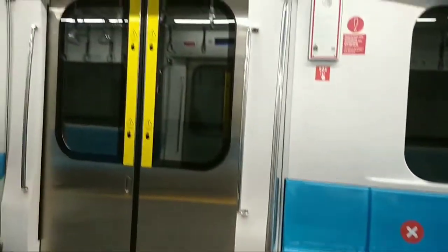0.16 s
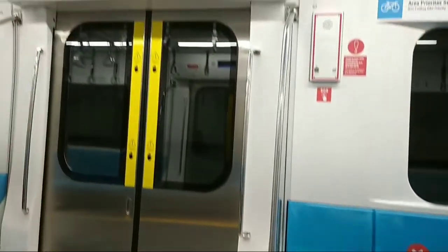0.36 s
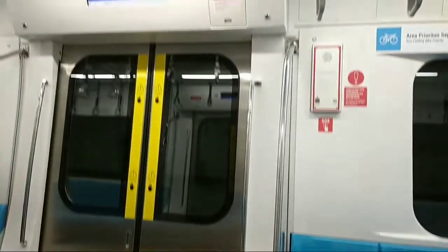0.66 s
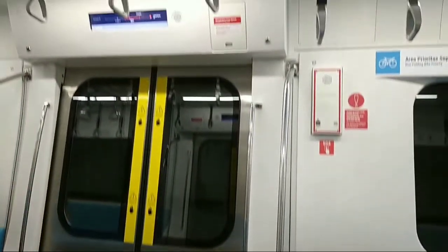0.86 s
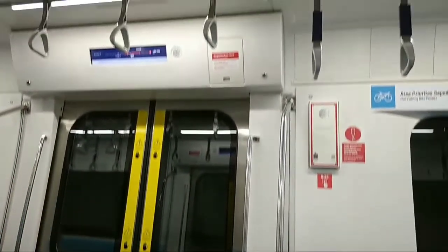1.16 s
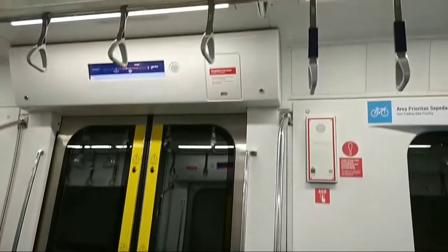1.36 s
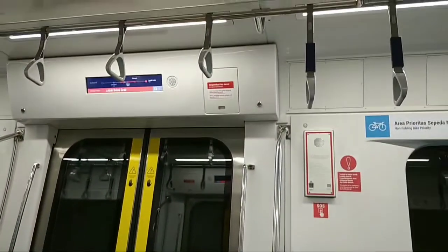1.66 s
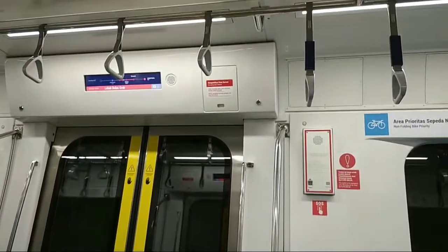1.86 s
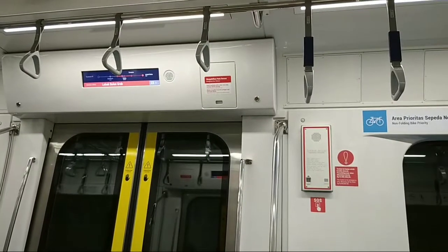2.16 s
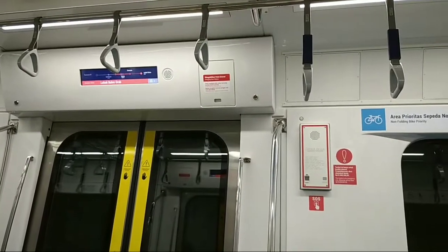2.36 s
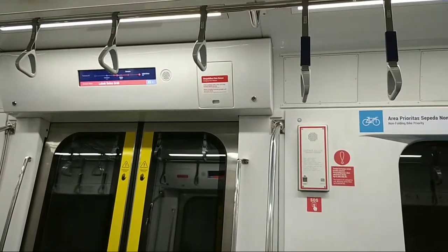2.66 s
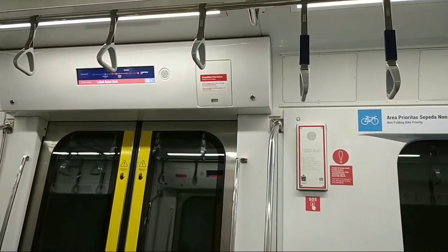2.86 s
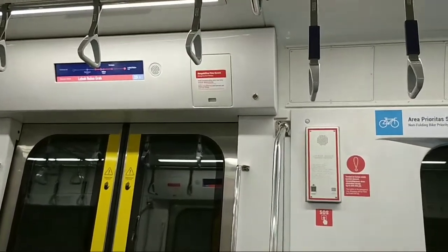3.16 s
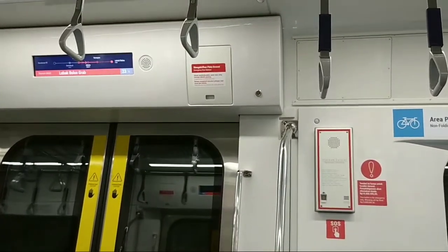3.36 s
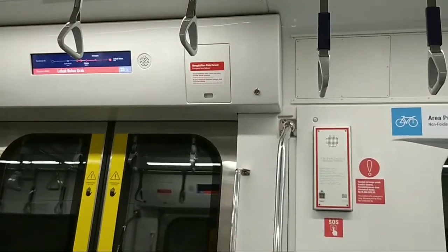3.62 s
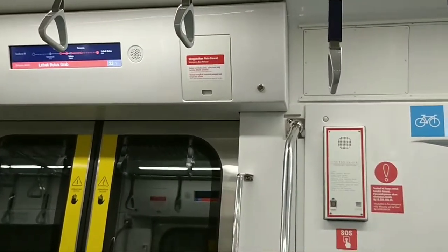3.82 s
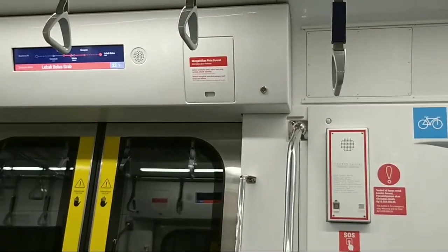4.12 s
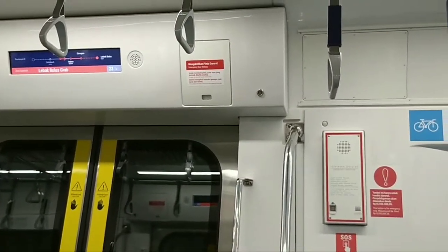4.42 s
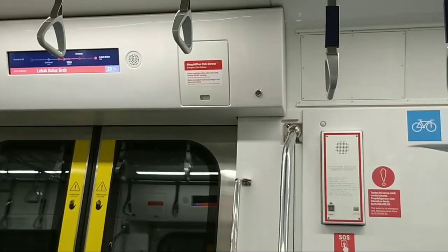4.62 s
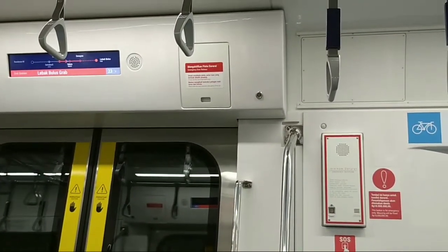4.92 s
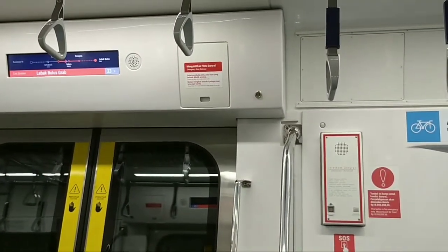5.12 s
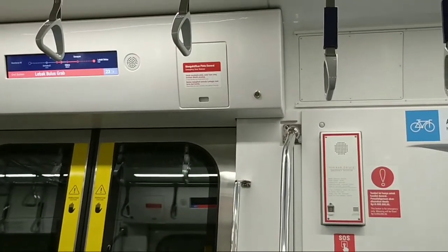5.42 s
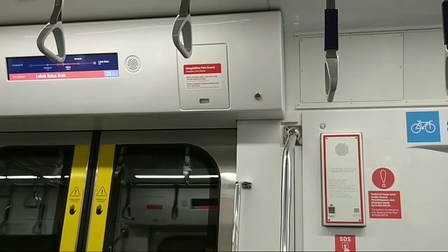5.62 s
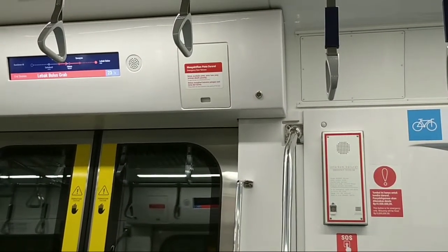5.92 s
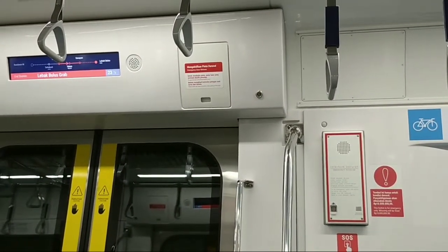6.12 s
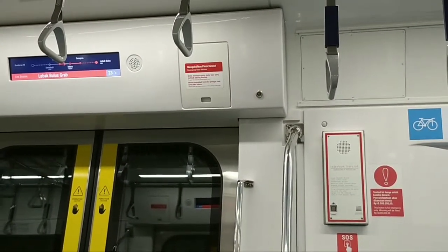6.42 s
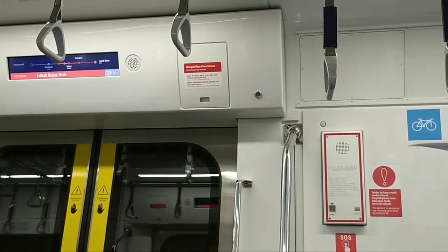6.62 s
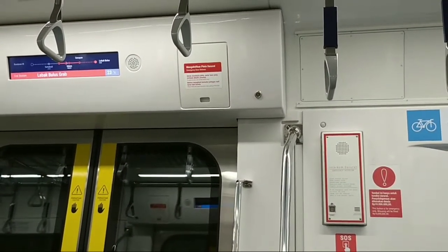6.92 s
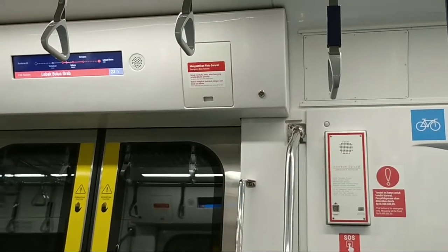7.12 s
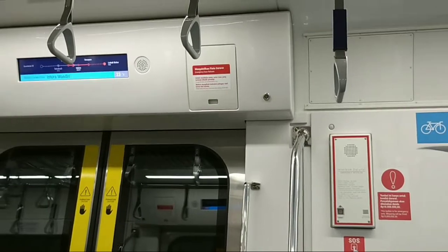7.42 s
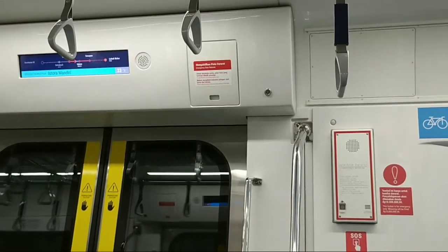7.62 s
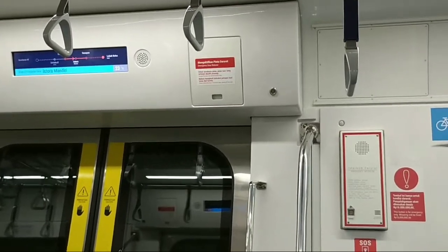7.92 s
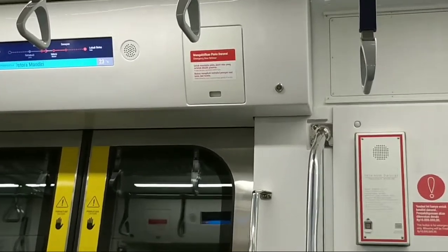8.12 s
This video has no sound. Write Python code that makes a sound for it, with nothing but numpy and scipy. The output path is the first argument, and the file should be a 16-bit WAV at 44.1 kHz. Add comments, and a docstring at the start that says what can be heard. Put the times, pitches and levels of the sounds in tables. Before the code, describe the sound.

A metro train runs through a tunnel, heard inside the carriage as a steady wheel roar, low rumble and thin hiss.

```python
"""Inside a metro carriage running through a tunnel at steady speed, heard from all sides in stereo.
From the start the wheels roar on the rail, the car body rumbles and the running gear hums under a thin
hiss, while rail and wheel resonances take turns to sing out. Between 1.2 and 2.6 s loose fittings tick
faintly on the left. Near 7.5 s three rough notes sing together, then the hum swells to the end.
Throughout, the recorder evens out the level and holds down the highest peaks."""
import sys
import numpy as np
from scipy.fft import rfft, irfft, next_fast_len
from scipy.io import wavfile
from scipy.ndimage import uniform_filter1d, minimum_filter1d, map_coordinates

SR = 44100
rng = np.random.default_rng(int(sys.argv[2]) if len(sys.argv) > 2 else 0)


def put_to_file(sound):
    """Save the sound as 16-bit audio at rate SR, in the file named by the first command-line argument."""
    columns = np.atleast_2d(sound).T  # one column per channel
    safe = np.clip(columns, -1, 1)
    whole_steps = np.round(safe * 32767)
    wavfile.write(sys.argv[1], SR, whole_steps.astype(np.int16))


N = 365059


# Tone colour of the rail's roar: freq_hz, level_db
RAIL_SPECTRUM = [(30, -75.5), (250, -19.5), (400, -10), (470, -6.5), (600, -3), (720, 0.5), (820, 2),
                 (930, 0), (1100, -7.5), (1500, -45.5), (5000, -83)]
# Track resonances: pitch_hz, width_hz, boost_db
RAIL_RESONANCES = [(498, 31, 2.9), (546, 25, 3), (674, 24, 2), (774, 70, 0.2)]
# Rougher and smoother stretches of track: start_s, length_s, change_db
TRACK_ROUGHNESS = [(2.42, 0.24, -1.5), (2.85, .08, 1.2), (3.2, 0.24, -1.9), (3.475, 0.099, 1),
                   (4.33, .45, -1), (5.2, 0.13, 0.9), (5.85, 0.19, 1.3)]

def rail_roar(level_db=-16.5):
    """Rolling wheels shake the rail into a midrange roar, louder where the track is rougher."""
    roughness_db = swells(TRACK_ROUGHNESS, edge_s=0.03)
    return amp(level_db + roughness_db) * diffuse(colour(RAIL_SPECTRUM, RAIL_RESONANCES))


# Wheel resonances: pitch_hz, width_hz, level_db
WHEEL_RESONANCES = [(1000.5, 59, -1.2), (1061.5, 113, 0.27), (1139, 183, 0.33)]
# The ring grows fuller or fainter: start_s, length_s, change_db
RING_SWELLS = [(1.15, .25, 4), (1.95, 0.79, -0.8), (3.35, 0.25, 1.2), (4.8, 2.2, 0.3)]

def wheel_ring(level_db=-17.5, radiate_hz=600, panel_hz=1500):
    """The steel wheels ring; they radiate little bass, and the panels damp their treble."""
    def mode(pitch, width):
        def gain(hz):
            low_cut = hz ** 2 / (hz ** 2 + radiate_hz ** 2)
            high_cut = 1 / np.sqrt(1 + (hz / panel_hz) ** 8)
            return bell(hz, pitch, width) * low_cut * high_cut
        return diffuse(gain)
    ring = unit(sum(amp(db) * mode(pitch, width) for pitch, width, db in WHEEL_RESONANCES))
    return amp(level_db + swells(RING_SWELLS, edge_s=0.068)) * ring


# Tone colour of the roar's bright edge: freq_hz, level_db
BRIGHT_SPECTRUM = [(30, -70), (900, -15), (1300, -3.5), (1480, 1), (1750, -0.5), (1950, -5.5), (2300, -6.5),
                   (2720, -14.5), (3020, -12.5), (3550, -20.5), (4100, -22), (4300, -34), (4700, -28),
                   (5300, -89)]
# Higher resonances of the steel: pitch_hz, width_hz, boost_db
BRIGHT_RESONANCES = [(1650, 56, 1.1), (1696, 52, 2.4), (1730, 70, 0.9)]
# The bright edge flares or eases: start_s, length_s, change_db
BRIGHT_FLARES = [(.75, 0.34, 0.6), (1.8, .22, -0.3), (2.45, 0.15, -1.3), (3.6, 0.12, 0.9),
                 (5.48, 0.24, 1.1), (6.2, 0.28, 0.4), (6.65, 0.31, 0.5), (7.05, 0.2, -0.9),
                 (7.55, .22, -0.7)]

def bright_edge(level_db=-22, wander_db=0.45):
    """Higher modes of rail and wheels put a bright edge on the roar."""
    envelope = amp(level_db + swells(BRIGHT_FLARES, edge_s=0.04) + wander_db * wobble(9.2))
    return envelope * diffuse(colour(BRIGHT_SPECTRUM, BRIGHT_RESONANCES))


def rolling(patch_db=0.5):
    """Rough steel drives rail and wheels; small patches lift all three layers together."""
    roar = rail_roar() + wheel_ring() + bright_edge()
    return amp(patch_db * wobble(36)) * roar


# Rough notes of rail and wheels: start_s, length_s, pitch_hz, level_db
SUNG_NOTES = [(.1, 0.99, 1002, -25.5), (.25, 0.44, 492, -28), (.6, 0.75, 1684, -33.5),
              (.65, .8, 560, -31.5), (1.35, 0.38, 1000, -25), (2.05, 0.4, 1500, -33.5),
              (2.8, 0.47, 1112, -25), (3.05, .45, 485, -27.5), (3.3, 1.2, 1692, -36), (3.3, 1.45, 996, -28),
              (3.95, .45, 1055, -33), (5.3, 0.9, 1700, -33), (5.6, .4, 1010, -26), (6.3, 1.22, 1001, -27),
              (6.45, 0.34, 494, -26), (7.42, 0.53, 492, -25.5), (7.45, 0.3, 781, -21),
              (7.48, 0.29, 363, -30.5)]

def singing(width_hz=34):
    """One resonance of rail or wheel after another catches and sings out as a narrow band of noise."""
    notes = 0
    for start, length, pitch, db in SUNG_NOTES:
        envelope = swells([(start, length, amp(db))], edge_s=0.048)
        notes += envelope * diffuse(lambda hz: bell(hz, pitch, width_hz))
    return notes


# Tone colour of the car body: freq_hz, level_db
RUMBLE_SPECTRUM = [(20, -24), (33, -22), (50, -15.5), (70, -3), (100, -1), (140, 0.5), (235, -0.2),
                   (320, 0.1), (420, 2), (600, -15), (1200, -53)]
# The low end swells and sinks: start_s, length_s, change_db
BASS_SWELLS = [(1.25, .22, 2.5), (2.2, 0.36, 1.5), (2.58, .3, 3.5), (3.2, .9, -2), (4.6, .3, 1.5),
               (5.25, .5, 3), (5.95, 0.39, -3), (6.38, .37, 3), (6.95, .55, -1.5), (7.7, 0.35, 2)]

def body_rumble(level_db=-30.4, shake_db=1.1, bass_hz=131):
    """Floor and wall panels rumble as the bogies shake them; the low end has swells of its own."""
    panels = amp(level_db + shake_db * wobble(12)) * diffuse(colour(RUMBLE_SPECTRUM), alike=0.96)
    bass = filtered(panels, lambda hz: 1 / (1 + (hz / bass_hz) ** 8))
    return panels + (amp(swells(BASS_SWELLS, edge_s=0.073)) - 1) * bass


# Lifts on top of the lower drone's beat: start_s, length_s, lift_db
LOW_DRONE_SWELLS = [(4.45, .55, 1.5), (7.72, .6, 8.5)]
# Uneven swells of the upper drone: start_s, length_s, lift_db
UPPER_DRONE_SWELLS = [(.15, 0.32, 5.5), (.9, 1.55, 5), (2.97, 0.45, 4.5), (3.98, 0.31, 5), (4.88, 1.2, 6),
                      (6.3, 0.39, 9), (7.22, 0.23, 6), (7.7, 0.49, 9.5)]
# Faint whines above the drones: pitch_hz, level_db
WHINE_TONES = [(400, -44), (490, -40.5)]

def gear_hum(low_db=-41, upper_db=-43.5, beat_db=4.5, beat_s=2.215, crest_s=0.35):
    """The running gear drones on two low tones, the lower one beating slowly; faint whines lie above."""
    beat = np.cos(2 * np.pi * (np.arange(N) / SR - crest_s) / beat_s)
    low_gain = amp(low_db + beat_db * beat + swells(LOW_DRONE_SWELLS, edge_s=0.08))
    low = low_gain * tone(hz=157.5, drift_hz=0.88, waver_db=1.9)
    upper_gain = amp(upper_db + swells(UPPER_DRONE_SWELLS, edge_s=0.068))
    upper = upper_gain * tone(hz=200.6, drift_hz=1.33, waver_db=1.7)
    whines = sum(amp(db) * tone(hz, drift_hz=2.98, waver_db=3) for hz, db in WHINE_TONES)
    return low + upper + whines


# Tone colour of the thin hiss: freq_hz, level_db
HISS_SPECTRUM = [(4000, -42), (6800, -11), (7480, -7), (7720, 0), (8750, 1.5), (9500, -2.5), (10300, -9.5),
                 (12000, -16), (14200, -24)]
# The hiss surges or slackens: start_s, length_s, change_db
HISS_SWELLS = [(.24, 0.37, 2.5), (1.23, 0.17, 3), (2.55, 0.28, 1.6), (3.75, 1, -1.3), (4.9, .27, -1.3),
               (5.5, .4, 1), (7.55, .7, -.9)]
# Tone colour of the rush of air: freq_hz, level_db
AIR_SPECTRUM = [(3000, -23), (5000, 0), (5700, 3.5), (6700, -1.5), (8500, 0.5), (11300, -4.5),
                (11900, -1.5), (13200, -4.5), (14200, -15)]

def hiss_and_air(hiss_db=-46, fall_db_per_s=0.06, flutter_db=1.03,
                 air_db=-49.5, waver_db=1.1, wander_db=0.5):
    """A thin, restless hiss sinks slowly over a nearly even rush of air; both wander together."""
    air = amp(air_db + waver_db * wobble(38)) * diffuse(colour(AIR_SPECTRUM))
    wander = amp(wander_db * wobble(11))
    contour_db = hiss_db - fall_db_per_s * np.arange(N) / SR + swells(HISS_SWELLS, edge_s=0.045)
    hiss = amp(contour_db + flutter_db * wobble(48)) * diffuse(colour(HISS_SPECTRUM))
    return wander * (air + hiss)


# Tone colour of a tick: freq_hz, level_db
TICK_SPECTRUM = [(3000, -25), (5000, -7), (7500, -6), (9400, 4.5), (11300, -1), (12500, -6), (14200, -16)]
# Ticks of loose fittings: start_s, level_db
TICK_HITS = [(1.2485, -34), (1.292, -41), (1.343, -41), (1.9215, -36), (2.578, -38.5)]

def fitting_ticks(attack_s=0.001, snap_t60_s=0.025, right_db=-7, tail_db=-9, tail_t60_s=0.2):
    """Loose fittings on the left tick: a short snap, then a bright puff from the carriage walls."""
    def bursts(t60_s):
        envelope = 0
        for start, db in TICK_HITS:
            age = np.maximum(np.arange(N) / SR - start, 0)
            envelope += amp(db - 60 * age / t60_s) * (1 - np.exp(-age / attack_s))
        return envelope * diffuse(colour(TICK_SPECTRUM))
    return amp([[0], [right_db]]) * bursts(snap_t60_s) + amp(tail_db) * bursts(tail_t60_s)


def amp(db):
    """Decibels to gain."""
    return 10 ** (np.asarray(db) / 20)


def unit(x):
    """x at rms 1."""
    return x / np.sqrt(np.mean(x ** 2) + 1e-20)


def along(points, hz):
    """Read a curve of (freq_hz, value) points on a log frequency axis."""
    freqs, values = np.transpose(points)
    return np.interp(np.log(hz + 1), np.log(freqs + 1), values)


def wobble(rate_hz):
    """A smooth random curve through rate_hz knots a second."""
    knots = rng.standard_normal(int(N * rate_hz / SR) + 4)
    return map_coordinates(knots, [np.arange(N) * rate_hz / SR])


def swells(rows, edge_s):
    """Sum of (start_s, length_s, height) swells; each rises, holds and falls with soft edges."""
    t = np.arange(N) / SR
    return sum(height * (np.tanh((t - start) / edge_s) - np.tanh((t - start - length) / edge_s)) / 2
               for start, length, height in rows)


def tone(hz, drift_hz, waver_db):
    """A sine of rms 1 that wanders a little in pitch and strength."""
    phase = 2 * np.pi * np.cumsum(hz + drift_hz * wobble(9)) / SR
    return unit(amp(waver_db * wobble(6.5)) * np.sin(phase))


def filtered(x, response):
    """Equalise x with the gain curve response(hz)."""
    size = next_fast_len(N + SR // 2)
    return irfft(rfft(x, size) * response(np.fft.rfftfreq(size, 1 / SR)), size)[..., :N]


def bell(hz, centre, width):
    """The peak of one resonance, 1 at its centre."""
    return 1 / (1 + (2 * (hz - centre) / width) ** 2)


def colour(spectrum, modes=()):
    """Gain curve of a broad spectrum with resonant boosts."""
    return lambda hz: amp(along(spectrum, hz)
                          + sum(db * bell(hz, pitch, width) for pitch, width, db in modes))


def diffuse(gain, spacing_m=0.17, alike=0.97, sound_m_per_s=343):
    """Noise of rms 1 from all sides: long waves reach both microphones alike, short ones do not."""
    def split(hz):
        likeness = alike * np.sinc(2 * hz * spacing_m / sound_m_per_s)
        return gain(hz) * np.sqrt([1 + likeness, 1 - likeness])
    mid, side = filtered(rng.standard_normal((2, N)), split)
    return unit(np.array([mid + side, mid - side]))


# Stereo balance across the spectrum: freq_hz, left_minus_right_db
STEREO_TILT = [(30, 2), (70, 6), (200, 5), (330, 5.5), (430, 4.5), (500, -1), (700, 0.1), (1200, -0.3),
               (7700, 0), (9000, 3.5), (13000, 5)]

def microphone_balance(hz):
    """Constant-power pan: the left microphone takes more of the bass and the top treble."""
    pair = amp(np.outer([0.5, -0.5], along(STEREO_TILT, hz)))
    return pair / np.sqrt(np.mean(pair ** 2, axis=0))


def gain_control(x, share=0.39, window_samples=8001):
    """One slow gain for both channels evens out a share of every swell and dip."""
    power = np.abs(uniform_filter1d(np.mean(x ** 2, axis=0), window_samples)) + 1e-12
    return x * (power / power.mean()) ** (-share / 2)


def limiter(x, ceiling, window_samples=89):
    """Each channel's gain ducks for a few milliseconds around any peak above the ceiling."""
    needed = np.minimum(1, ceiling / (np.abs(x) + 1e-9))
    held = minimum_filter1d(needed, window_samples)
    return x * uniform_filter1d(held, window_samples)


def scene():
    """The whole carriage at two spaced microphones."""
    carriage = body_rumble() + rolling() + gear_hum() + singing() + hiss_and_air() + fitting_ticks()
    return filtered(carriage, microphone_balance)


def record(dry, top_hz=14260):
    """The recorder evens out the level, limits the peaks and cuts everything above top_hz."""
    limited = limiter(gain_control(dry), ceiling=0.72)
    return filtered(limited, lambda hz: hz < top_hz)


dry = scene()
out = record(dry)
put_to_file(out)
```